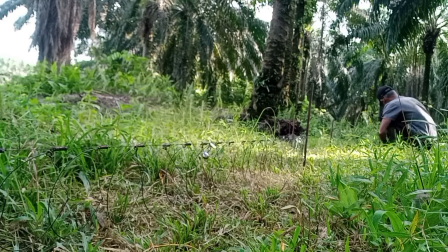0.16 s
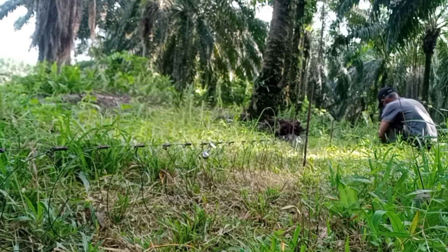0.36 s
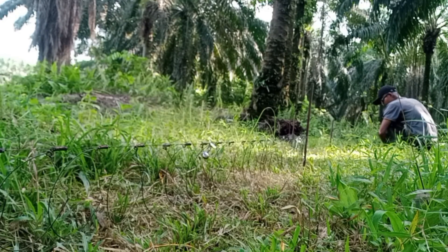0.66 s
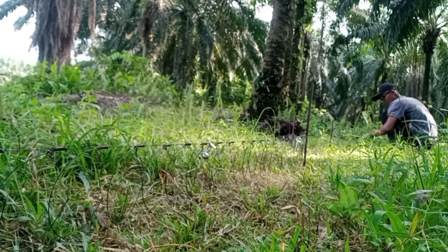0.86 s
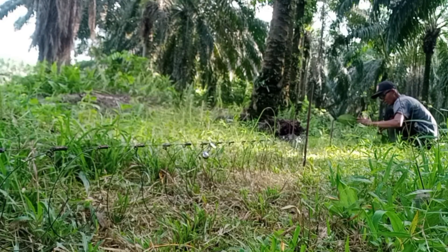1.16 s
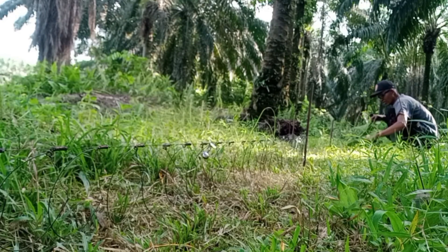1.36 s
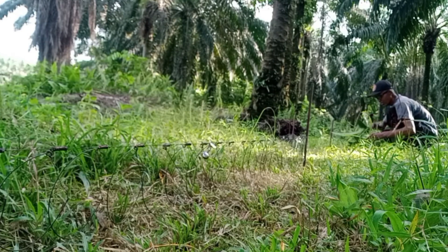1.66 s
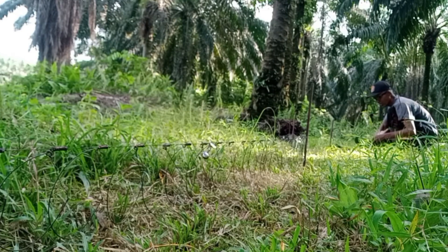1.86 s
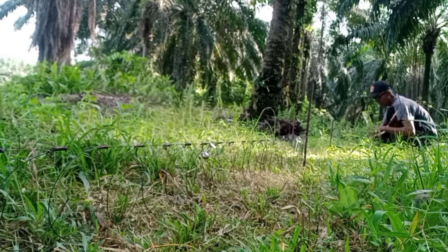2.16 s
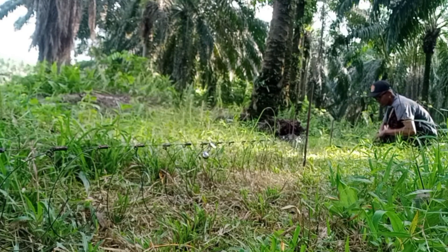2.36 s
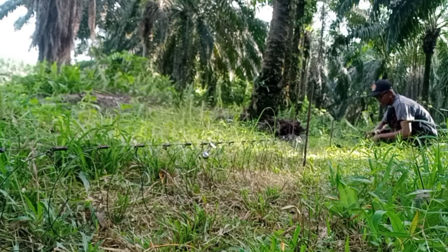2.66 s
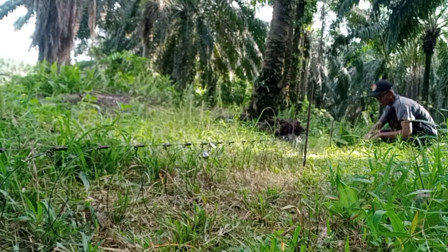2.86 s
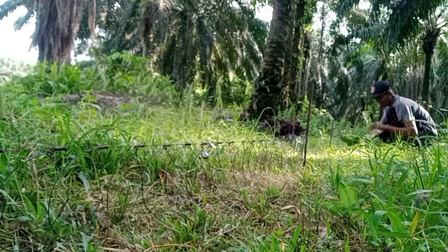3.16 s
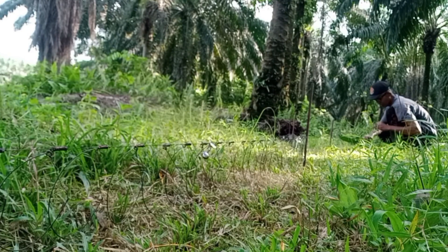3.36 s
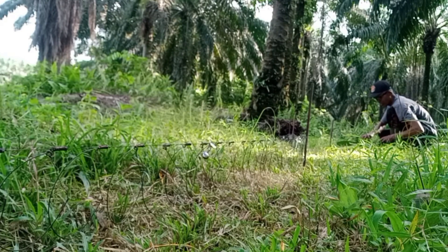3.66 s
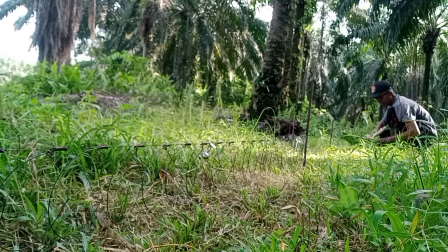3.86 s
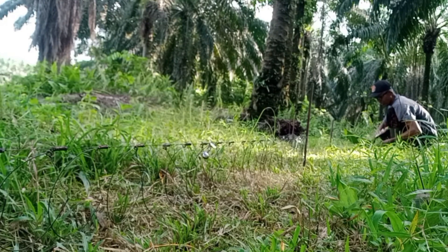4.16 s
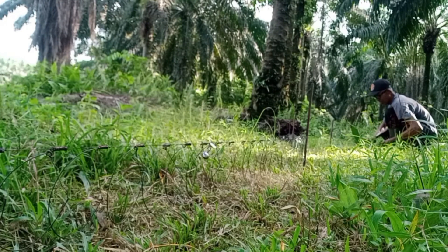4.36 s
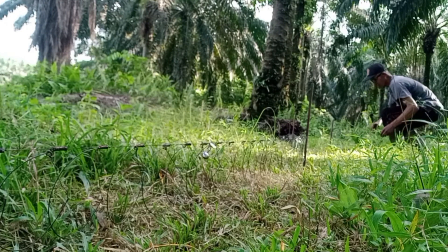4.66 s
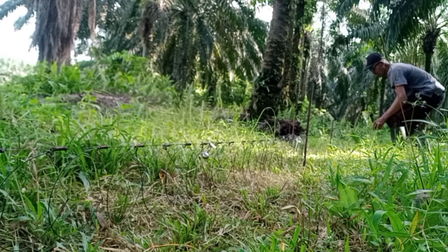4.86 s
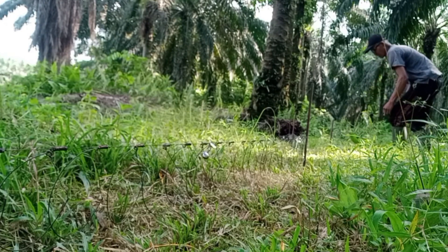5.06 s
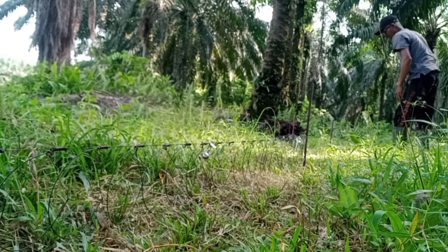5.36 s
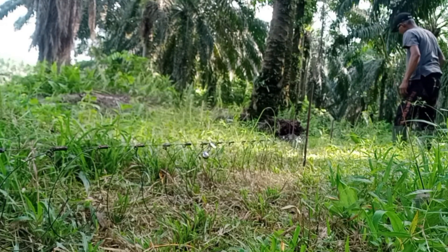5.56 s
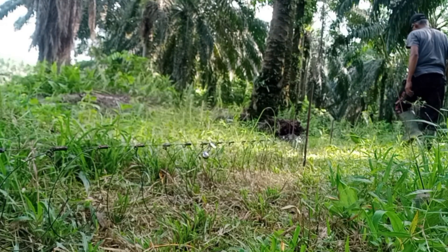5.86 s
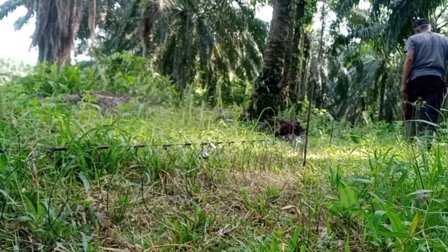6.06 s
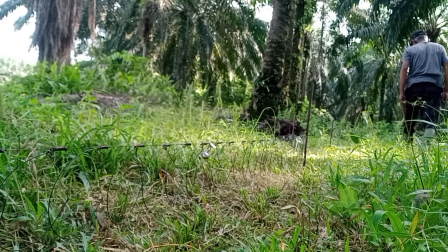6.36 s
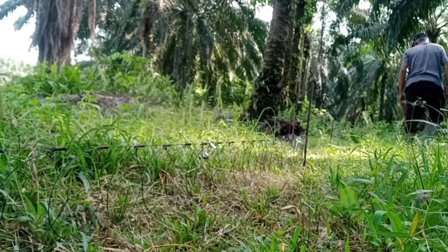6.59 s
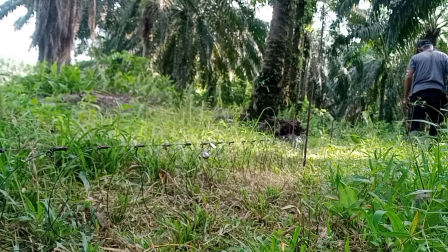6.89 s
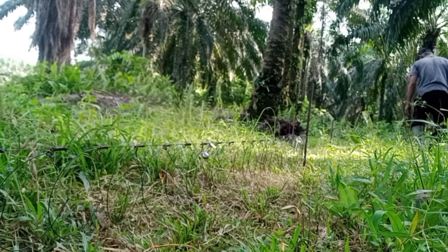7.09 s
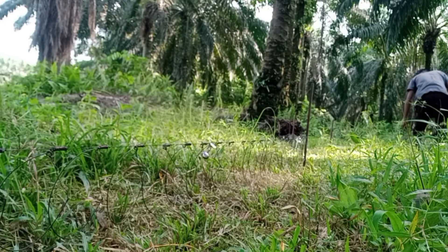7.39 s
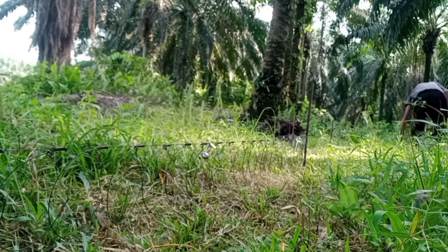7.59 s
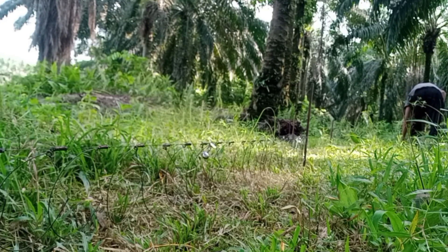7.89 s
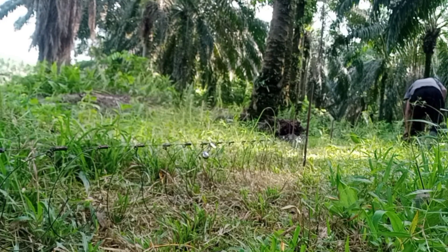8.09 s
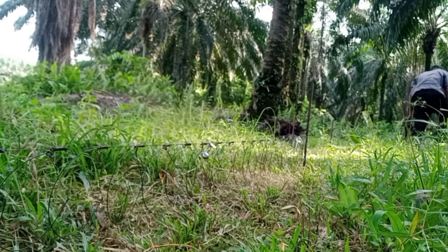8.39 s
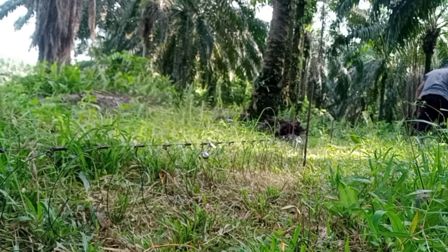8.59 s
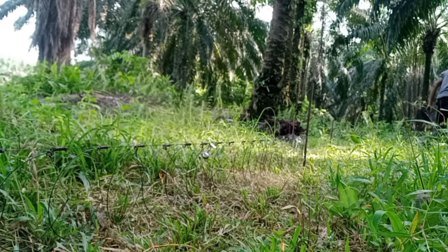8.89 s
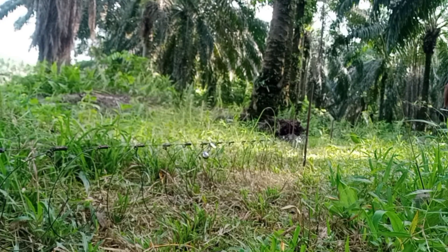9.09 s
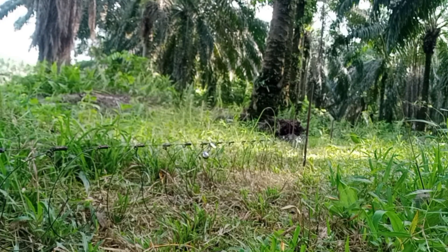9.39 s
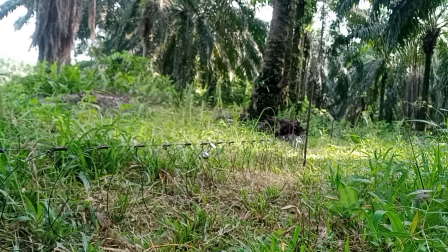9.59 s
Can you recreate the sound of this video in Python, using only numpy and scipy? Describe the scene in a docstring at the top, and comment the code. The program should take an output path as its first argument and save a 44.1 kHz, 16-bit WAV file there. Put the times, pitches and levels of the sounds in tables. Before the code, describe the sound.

A waterhen gives nine short, evenly spaced rising hoots. After a brief pause it starts a quieter run of quick clucks that grow harsher and bunch into pairs and triplets. A second waterhen answers further off with hoarse rising wails, and small birds call faintly in the distance. Cicadas drone and a cricket chirps throughout, with a short echo from the surrounding palms.

```python
"""A white-breasted waterhen gives nine short rising hoots, then a long run of clucks that grow harsher.
Each hoot breaks from a low note to a high one; each cluck layers a rasp, a chest thump and a throat tone.
A second waterhen further off answers with rising wails. Behind them cicadas drone, katydids sizzle,
a cricket chirps, small birds call, leaves rustle and a dry stalk snaps. The trunks and fronds of the
oil-palm plantation scatter the calls back as a short reverb."""
import sys
import numpy as np
from scipy import signal
from scipy.fft import rfft, irfft, next_fast_len
from scipy.io import wavfile
from scipy.ndimage import map_coordinates

SR = 44100
rng = np.random.default_rng(int(sys.argv[2]) if len(sys.argv) > 2 else 0)


def put_to_file(sound):
    """Save the sound as 16-bit audio at rate SR, in the file named by the first command-line argument."""
    columns = np.atleast_2d(sound).T  # one column per channel
    safe = np.clip(columns, -1, 1)
    whole_steps = np.round(safe * 32767)
    wavfile.write(sys.argv[1], SR, whole_steps.astype(np.int16))


N = 429534

# Reverb decay of the grove, before each source's stretch: freq_hz, t60_s
GROVE_DECAY = [(200, 0.17), (1200, 0.31), (3700, 0.35), (10000, 0.21)]
# How strongly the trees send each frequency back: freq_hz, gain_db
GROVE_EQ = [(150, -2), (290, 5), (550, -2), (870, -4.5), (1100, -3.5), (1330, 0), (1500, 2), (1750, 6),
            (2100, 7), (3500, -1.5)]
# Colour of the moving air: freq_hz, gain_db
AIR_EQ = [(20, -29.5), (45, -18), (75, -4), (130, 0), (200, -4), (330, -9), (800, -15.5), (1350, -7.5),
          (2000, -27), (3000, -22), (4200, -25), (8000, -32)]
# Colour of the rustling leaves: freq_hz, gain_db
LEAF_EQ = [(200, -19), (600, 1.5), (1400, 9), (2000, -9.5), (3500, -4), (9000, -25), (15000, -15.5)]
# Leaves and stalks being handled: peak_s, length_s, relative_level_db
RUSTLE_CUES = [(2.709, 0.13, -69), (2.859, .1, -62), (2.988, 0.12, -69.5), (4.226, 0.048, -71)]
# Colour of the cicada chorus: freq_hz, gain_db
CICADA_EQ = [(4100, -39), (4600, -16.5), (5000, -25.5), (5650, -16), (6200, -26), (6600, -7), (7000, 0.5),
             (7500, -2), (8100, -12.5), (8800, -23.5), (9300, -29.5), (10000, -36.5), (11000, -20.5),
             (12000, -33), (13200, -33.5), (15500, -48.5)]
# Colour of the katydids: freq_hz, gain_db
KATYDID_EQ = [(11500, -42), (13000, -19), (13900, -3.5), (14500, 2), (15000, -2), (15500, -8.5)]
# Fader ride on the katydids: time_s, relative_level_db
KATYDID_FADER = [(.8, -64), (1.15, -67), (2.2, -66.5), (8.2, -65.5), (9.3, -63)]
# Tempo of the cricket: time_s, chirps_per_s
CHIRP_PACE = [(0, 6.5), (1.3, 6.93), (3.8, 7.1), (6.7, 6.76), (9, 6.92)]
# Fader ride on the twittering flock: time_s, relative_level_db
FLOCK_FADER = [(5.2, -67), (5.5, -69), (5.7, -74), (6.3, -64.5), (7.0, -75), (7.3, -81), (7.65, -69),
               (8.7, -70.5), (9.0, -90)]
# Distant bird calls: start_s, length_s, pitch_hz, send_level_db, roughness (0 is a pure whistle)
FAR_CALL_CUES = [(0.457, .018, 2360, -64.5, 0.47), (6.515, 0.029, 4310, -61, 0.1),
                 (6.845, 0.072, 4280, -55.5, 0.2), (7.048, 0.032, 3300, -58, 0.24),
                 (8.008, 0.095, 3100, -54.5, 0.81), (8.114, .12, 3100, -54, .8),
                 (8.276, .05, 3150, -47.5, 0.58), (8.36, 0.071, 2960, -58, 1.22),
                 (8.487, 0.0437, 4293, -46, 0.39), (8.513, 0.11, 3207, -51.5, 0.42),
                 (8.684, .16, 2764, -66, 0.87), (8.872, 0.205, 2226, -71.5, 0.62)]
# Wails of the second waterhen: start_s, relative_level_db
WAIL_CUES = [(1.404, -55), (5.057, -53), (5.708, -52), (6.272, -50.5), (6.792, -50), (7.246, -52)]
# Clucks, single or in quick bursts: time_s, cluck_count, relative_level_db
CLUCK_CUES = [(5.249, 1, -48), (5.33, 1, -50.5), (5.426, 1, -51), (5.513, 2, -51), (5.67, 1, -49.5),
              (5.757, 1, -54), (5.836, 1, -54), (5.919, 1, -53.5), (6.007, 1, -54), (6.088, 1, -55.5),
              (6.173, 1, -50), (6.262, 1, -49.5), (6.35, 1, -48), (6.433, 1, -50.5), (6.529, 2, -54),
              (6.697, 2, -53.5), (6.865, 1, -51), (6.952, 1, -49), (7.056, 1, -50.5), (7.146, 1, -62),
              (7.213, 2, -53.5), (7.358, 1, -48.5), (7.442, 1, -48.5), (7.523, 1, -50.5), (7.619, 1, -52),
              (7.705, 3, -54), (7.88, 2, -47.5), (8.021, 1, -50.5), (8.099, 1, -51), (8.177, 1, -51),
              (8.276, 3, -50), (8.506, 3, -52), (8.729, 2, -52.5), (8.887, 2, -52.5), (9.047, 2, -51.5),
              (9.205, 2, -51), (9.367, 2, -49), (9.531, 2, -50.5), (9.701, 1, -49.5)]
# Spacing of the clucks within a burst: time_s, gap_s
BURST_SPACING = [(7.2, 0.068), (8.3, .054), (9.0, .058), (9.5, 0.065)]
# How wide the beak is: time_s, opening (0 shut, 1 wide)
BEAK_OPENING = [(5.2, 0.08), (7.8, 0), (7.95, 0.66), (8.7, 1), (9.15, 0.95), (9.35, 1), (9.74, 0.78)]
# Throat resonances with the beak shut: freq_hz, gain_db
BEAK_SHUT_EQ = [(400, -28.5), (660, -5), (850, 4), (1080, -5), (1270, 3), (1480, -4), (1680, -50),
                (2100, -24.5), (4000, -68)]
# Throat resonances with the beak wide: freq_hz, gain_db
BEAK_WIDE_EQ = [(380, -36.5), (640, -6), (850, 7), (1100, -5), (1330, 3.5), (1500, -1), (1720, 3),
                (1930, -10), (2100, -29), (4000, -53.5)]
# The clucking voice: time_s, clearness_db (tilts the mix from rasp to throat tone), throat_pitch_hz
CLUCK_VOICE = [(5.25, 12, 912), (5.67, 10.5, 838), (5.82, -3, 833), (6.08, -8.5, 962), (6.18, 10, 864),
               (6.3, 10, 869), (6.5, -4.5, 910), (7.05, -3, 876), (7.16, 22.5, 984), (7.36, 10.5, 883),
               (7.78, 15, 876), (7.88, 12, 934), (8.28, 8, 949), (8.6, 7, 888), (9.05, 3.5, 856),
               (9.74, 0.5, 848.4)]
# Hoots, cued on the high note: time_s, level_db
HOOT_CUES = [(.369, -32.5), (.874, -32), (1.38, -32), (1.883, -31.5), (2.376, -31), (2.88, -31),
             (3.384, -30), (3.891, -30.5), (4.386, -30.5)]


def amp(db):
    """Decibels to gain."""
    return 10 ** (np.asarray(db) / 20)


def unit(x):
    """Scale to rms 1."""
    return x / np.sqrt(np.mean(x ** 2) + 1e-20)


def along(points, hz):
    """Read a frequency curve on a log axis."""
    freqs, values = np.transpose(points)
    return np.interp(np.log(hz + 1), np.log(freqs + 1), values)


def curves(rows, t):
    """Automation: each column after the time, read at times t."""
    times, *columns = np.transpose(rows)
    return [np.interp(t, times, column) for column in columns]


def wobble(rate, size=N):
    """A smooth random modulator, rate knots a second."""
    knots = rng.standard_normal(int(size * rate / SR) + 4)
    return map_coordinates(knots, [np.arange(size) * rate / SR + 1])


def coloured(x, eq):
    """x through an EQ curve, at rms 1."""
    size = next_fast_len(len(x) + 2048)
    gain = amp(along(eq, np.fft.rfftfreq(size, 1 / SR)))
    return unit(irfft(rfft(x, size) * gain, size)[:len(x)])


def noise(eq):
    """Coloured noise at rms 1."""
    return coloured(rng.standard_normal(N), eq)


def turns(hz):
    """Running phase of a pitch curve, from a random start."""
    return 2 * np.pi * (np.cumsum(hz) / SR + rng.random())


def tone(phase):
    """A sine of rms 1."""
    return np.sqrt(2) * np.sin(phase)


def swell(t, rise, fall):
    """A bell envelope around t = 0 with its own rise and fall times."""
    return np.exp(-.5 * (t / np.where(t < 0, rise, fall)) ** 2)


def step(t, width):
    """A smooth step from 0 to 1 around t = 0."""
    return .5 + .5 * np.tanh(t / width / 2)


def held(t, length, attack, release):
    """Attack, hold and release of a note that starts at t = 0."""
    ramp = np.clip(np.minimum(t / attack, (length - t) / release), 0, 1)
    return np.sin(np.pi / 2 * ramp) ** 2


def add(track, s, x):
    """Mix x into the track from time s."""
    start = max(round(s * SR), 0)
    part = track[start:start + len(x)]
    part += x[:len(part)]


def grove(x, stretch=1, build_s=0.0083):
    """Reverb from trunks and fronds: a new tail each time, thickening as more trees answer."""
    hz, t, grains = signal.stft(rng.standard_normal(SR * 3 // 4), SR, nperseg=256)
    t60_s = stretch * along(GROVE_DECAY, hz)[:, None]
    grains *= amp(-60 * t / t60_s) * (1 - np.exp(-(t / build_s) ** 2))
    grains /= np.linalg.norm(signal.istft(grains, SR, nperseg=256)[1])
    tail = signal.istft(grains * amp(along(GROVE_EQ, hz))[:, None], SR, nperseg=256)[1]
    return signal.fftconvolve(x, tail)


def air():
    """A faint bed of moving air."""
    return amp(-81.5 + 1.3 * wobble(5.8)) * noise(AIR_EQ)


def rustles(snaps_per_s=180):
    """Handled leaves: tiny snaps over a soft swish."""
    t = np.arange(N) / SR
    handling = sum(amp(db) * swell(t - s, length / 3, length / 3) for s, length, db in RUSTLE_CUES)
    snaps = (rng.random(N) < snaps_per_s / SR) * amp(2.5 * np.clip(rng.standard_normal(N), -2, 2))
    swish = amp(-3.5 + 2.5 * wobble(52)) * rng.standard_normal(N)
    return amp(1.5) * handling * coloured(unit(snaps) + swish, LEAF_EQ)


def stalk_snap(start_s=4.789, ring_hz=3400, level_db=-58.5, t60_s=.025):
    """A dry stalk snaps with a short, rough ring."""
    out = np.zeros(N)
    t = np.arange(0, .04, 1 / SR)
    envelope = amp(level_db - 60 * t / t60_s) * (1 - np.exp(-t / .0005))
    snap = envelope * tone(turns(ring_hz * (1 + .1 * wobble(1500, len(t)))))
    add(out, start_s, snap)
    add(out, start_s, amp(-8) * grove(snap))
    return out


def cicadas(level_db=-51.4):
    """Many cicadas merge into one steady band."""
    return amp(level_db + 0.14 * wobble(1.3) + 0.54 * wobble(120)) * noise(CICADA_EQ)


def katydids():
    """Two katydids sizzle at the top end, each with its own flutter."""
    sizzle = sum(amp(2.4 * wobble(25) + 0.79 * wobble(100)) * noise(KATYDID_EQ) for _ in range(2))
    return amp(curves(KATYDID_FADER, np.arange(N) / SR)[0] + 3.5) * unit(sizzle)


def cricket(carrier_hz=5500, fall_hz=450, strokes_per_s=80, dry_db=-58.5):
    """Evenly paced chirps of a few wing strokes, each stroke a falling tone."""
    out, upper_edge = np.zeros(N), np.zeros(N)
    clock = np.arange(N) / SR
    chirps_done = np.cumsum(curves(CHIRP_PACE, clock)[0]) / SR
    t = np.arange(-.05, .05, 1 / SR)
    for beat in np.interp(np.arange(chirps_done[-1]), chirps_done, clock):
        s = .048 + beat + .004 * rng.normal()
        stroke = (t * strokes_per_s + rng.random()) % 1
        pitch = carrier_hz - fall_hz * (stroke - .5) + 35 * wobble(200, len(t))
        half_length_s = 0.034 + 0.0018 * rng.normal()
        envelope = np.exp(-np.abs(t / half_length_s) ** 6) * amp(1.8 * wobble(83, len(t)))
        chirp = envelope * np.sin(np.pi * stroke) ** 2 * tone(turns(pitch))
        add(out, s + t[0], chirp)
        # the trees return the high start of each stroke best
        add(upper_edge, s + t[0], chirp * (1 - stroke) ** 2)
    return amp(dry_db) * (unit(out) + amp(-4.5) * unit(grove(upper_edge)[:N]))


def flock(twitters_per_s=64, centre_hz=4095):
    """A far flock: a cloud of tiny gliding twitters, heard only through the trees."""
    out = np.zeros(N)
    t = np.arange(0, .06, 1 / SR)
    for s in np.arange(FLOCK_FADER[0][0], N / SR, 1 / twitters_per_s):
        detune, glide = .085 * rng.normal(), 1.19 * rng.normal()
        pitch = centre_hz * np.exp(detune + glide * t + 0.0256 * wobble(602, len(t)))
        add(out, s + .04 * rng.random(), np.hanning(len(t)) * tone(turns(pitch)))
    return amp(curves(FLOCK_FADER, np.arange(N) / SR)[0] - 3.0) * unit(grove(out)[:N])


def far_birds():
    """Slightly falling squawks and whistles, heard only through the trees."""
    out = np.zeros(N)
    for s, length, hz, db, roughness in FAR_CALL_CUES:
        size = int(length * SR)
        fall = 1 + 0.0243 * np.linspace(1, -1, size)
        pitch = hz * fall * (1 + 0.091 * roughness * wobble(900, size))
        call = amp(db) * signal.windows.tukey(size, .4) * tone(turns(pitch))
        add(out, s, grove(call, stretch=1.32, build_s=0.001))
    return out


def wails(start_hz=479, top_hz=761.4, rise_s=.155, length_s=0.15, bright_delay_s=.025):
    """The second waterhen's hoarse wail climbs and levels off; the trees smear its upper harmonics."""
    out = np.zeros(N)
    t = np.arange(0, length_s, 1 / SR)
    pitch = start_hz + (top_hz - start_hz) * np.sin(np.pi / 2 * t / rise_s)
    low_envelope = amp(-4) * held(t, length_s, 0.0094, 0.017) * swell(t - .078, 0.053, 0.027)
    bright_envelope = held(t - bright_delay_s, length_s - bright_delay_s, attack=.018, release=0.041)
    for s, db in WAIL_CUES:
        phase = turns(pitch * (1 + 0.021 * wobble(356, len(t))))
        level = amp(db + 1.5 * wobble(140, len(t)))
        low = level * low_envelope * tone(phase)
        overtones = tone(3 * phase) + amp(-2.5) * (tone(4 * phase) + tone(5 * phase) + tone(6 * phase))
        grit = amp(-32) * overtones * wobble(300, len(t))
        bright = level * bright_envelope * (tone(2 * phase) + grit)
        add(out, s, low + amp(-5.0) * bright)
        add(out, s, grove(amp(-11.5) * low + amp(3.0) * bright, stretch=1.66, build_s=0.0069))
    return out


def syrinx_rasp(t, flap_hz, opening, formant_shift, breath=0.8):
    """The syrinx flaps unevenly, one sharp, breathy puff a cycle; throat and beak colour the puffs."""
    phase = turns(flap_hz * np.exp(.16 * wobble(279.7, len(t))))
    puffs = np.exp(40 * (np.cos(phase) - 1))
    flaps = puffs * (1 + 6 * breath * rng.standard_normal(len(t)))
    flaps += 0.72 * breath * rng.standard_normal(len(t))
    shut = coloured(flaps, np.multiply(BEAK_SHUT_EQ, [formant_shift, 1]))
    wide = coloured(flaps, np.multiply(BEAK_WIDE_EQ, [formant_shift, 1]))
    return unit((1 - opening) * shut + opening * wide)


def cluck(t, s, db, repeat, throat_share=0.52):
    """One cluck starts as a rasp, thumps in the chest and ends on a short throat tone."""
    opening = np.clip(curves(BEAK_OPENING, s)[0], 0, 1)
    clear_db, throat_hz = curves(CLUCK_VOICE, s)
    tension, bend, vowel, accent = rng.standard_normal(4)
    # later clucks of a burst thump less and rasp more
    thump_db = db + 4 - 3 * repeat
    rasp_db = db + 1 + 7 * opening - (1 - throat_share) * clear_db + repeat
    throat_db = db - 6.5 + 7.5 * opening + throat_share * clear_db + 1.3 * accent
    chest_hz = 290 + 12 * tension - 700 * t + 12 * wobble(146.8, len(t))
    thump = amp(thump_db) * swell(t + 0.0024, 0.0033, 0.0065 + 0.0031 * opening) * tone(turns(chest_hz))
    glide = (4 * (1 - opening) + 2.53 * bend) * (t - .004)
    pitch = throat_hz * (1 + 0.014 * vowel + glide + 0.02 * wobble(208, len(t)))
    throat = amp(throat_db) * swell(t - .004, 0.0091, 0.0064 + 0.016 * opening) * tone(turns(pitch))
    rasp = syrinx_rasp(t, chest_hz, opening, formant_shift=np.exp(0.036 * vowel))
    rasp *= amp(rasp_db) * swell(t + 0.0048 - 0.0057 * opening, 0.01, 0.012)
    # the air flow starts and stops sharply, and lasts longer with the beak open
    gate = step(t + 0.016 + 0.0014 * opening, 0.0019) * step(.015 + .005 * opening - t, 0.0029)
    return gate * thump, gate * throat, gate * rasp


def clucks():
    """The chatter begins with single clucks and bunches into pairs and triplets as the beak opens."""
    out = np.zeros(N)
    t = np.arange(-.03, .05, 1 / SR)
    for start, count, db in CLUCK_CUES:
        for k in range(round(count)):
            s = start + k * curves(BURST_SPACING, start)[0]
            thump, throat, rasp = cluck(t, s, db, repeat=k > 0)
            send = amp(-11) * thump + amp(-18.5) * throat + amp(-10.5) * rasp
            add(out, s + t[0], thump + throat + rasp)
            add(out, s + t[0], grove(send, stretch=0.7))
    return out


def hoots(low_hz=425, high_hz=607, overshoot_hz=14, lead_s=.06, tail_s=0.037, swell_db_per_s=28.5):
    """A low note breaks upward into a high one; the throat picks out the second harmonic."""
    out = np.zeros(N)
    t = np.arange(-lead_s, tail_s, 1 / SR)
    since_break = t + .0105
    high = step(since_break, 0.0047)
    pitch = low_hz + (high_hz - low_hz) * high + overshoot_hz * swell(t - .008, 0.0026, 0.0062)
    # the low note is softer, and the voice dips at the break before full effort comes
    effort_db = -7.5 * step(-t - 0.0026, 0.0022) - 9.5 * swell(since_break, 0.003, 0.0039)
    envelope = held(t - t[0], lead_s + tail_s, attack=.007, release=0.017)
    envelope *= amp(effort_db + swell_db_per_s * t)
    # odd harmonics leak through, most of all at the break
    leak = amp(-33.5) * (1 - high) + amp(-48.5) * high + amp(1.5) * swell(since_break, 0.0033, 0.0036)
    for s, db in HOOT_CUES:
        phase = turns(pitch * (1 + 0.0092 * wobble(157, len(t))))
        level = envelope * amp(db + .6 * wobble(200, len(t)))
        odd = tone(phase) + amp(-18.0) * tone(3 * phase + 0.54 * wobble(280, len(t)))
        voice = level * (tone(2 * phase) + leak * odd)
        # the chest gives a soft low push under the jump
        chest = tone(turns(275 + 25 * wobble(120, len(t))))
        voice += amp(db - 33.5) * swell(t + 0.01, .017, 0.019) * chest
        # a hoarse overtone grows through the series and arrives mostly by way of the trees
        hoarseness = amp(db - 28 + 1.03 * s) * swell(t - .008, 0.0034, 0.013)
        overtone = hoarseness * tone(6 * phase + 0.35 * wobble(450, len(t)))
        add(out, s + t[0], voice + overtone)
        add(out, s + t[0], grove(amp(-20) * voice + amp(3.5) * overtone))
    return out


def scene():
    """Mono mix: the waterhens over distant birds, insects and undergrowth."""
    birds = hoots() + clucks() + wails() + far_birds() + flock()
    insects = cricket() + cicadas() + katydids()
    undergrowth = rustles() + air() + stalk_snap()
    return (birds + insects + undergrowth)[None]


def record(dry, cutoff_hz=15550):
    """A brick-wall low-pass on the whole mix."""
    size = next_fast_len(N + SR // 2)
    passband = np.fft.rfftfreq(size, 1 / SR) < cutoff_hz
    return irfft(rfft(dry, size) * passband, size)[:, :N]


dry = scene()
out = record(dry)
put_to_file(out)
```